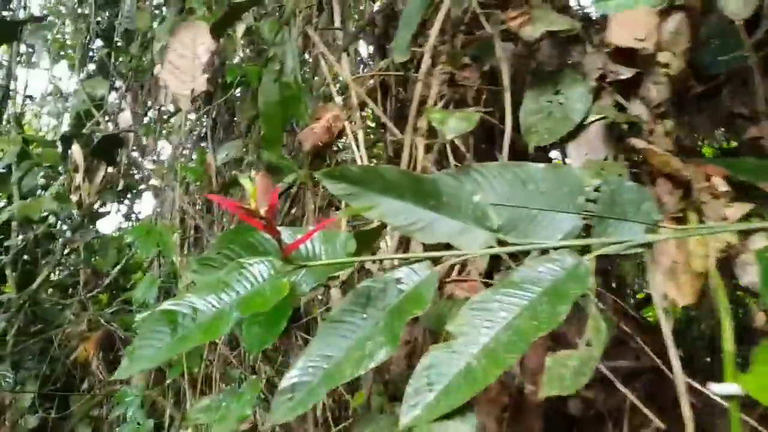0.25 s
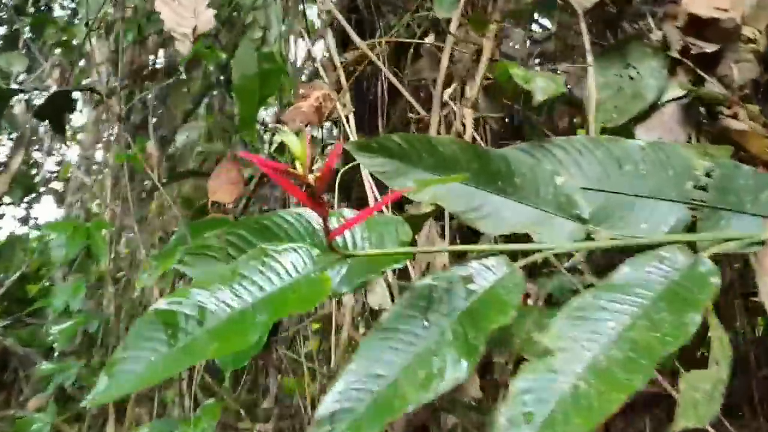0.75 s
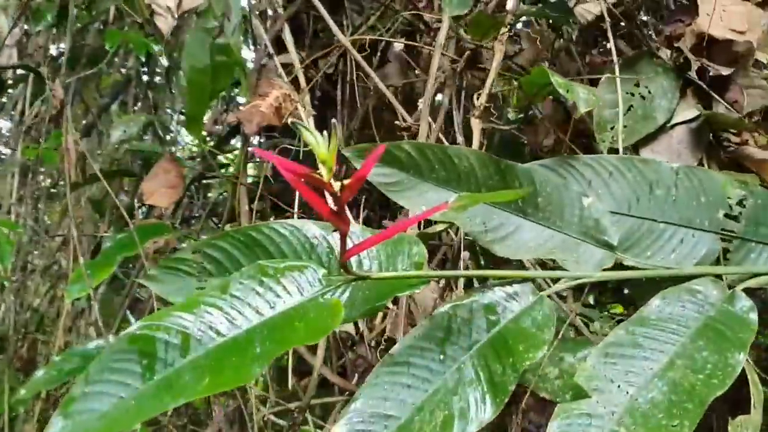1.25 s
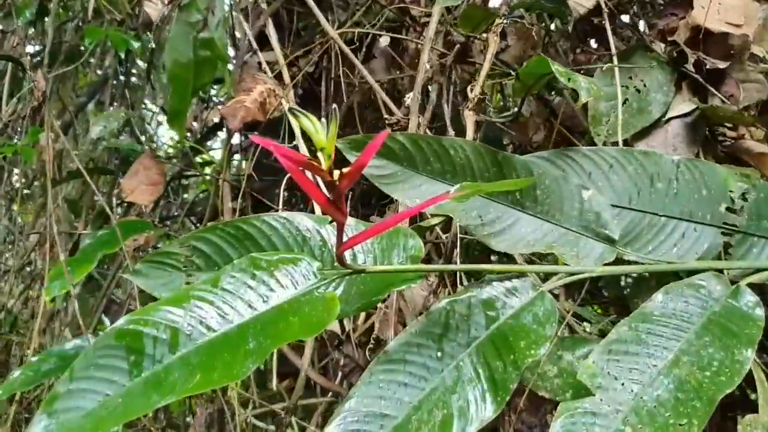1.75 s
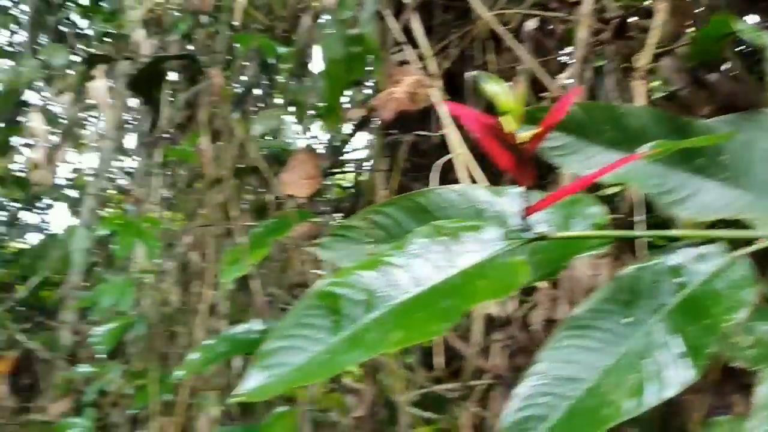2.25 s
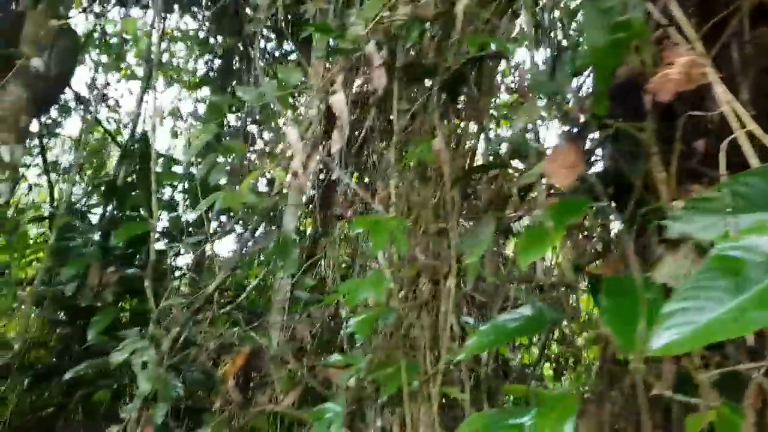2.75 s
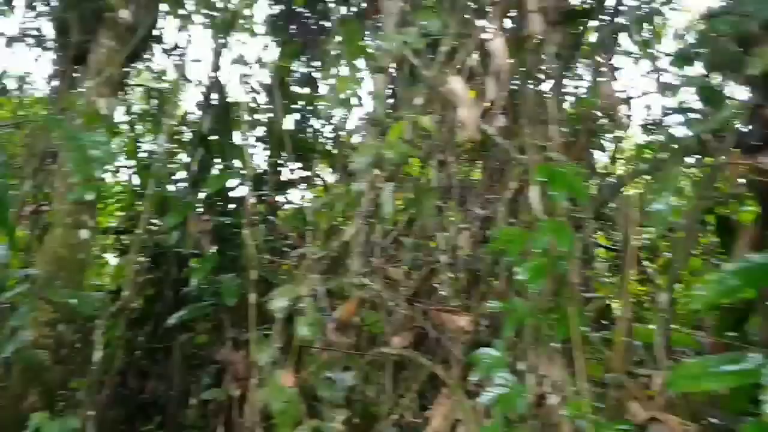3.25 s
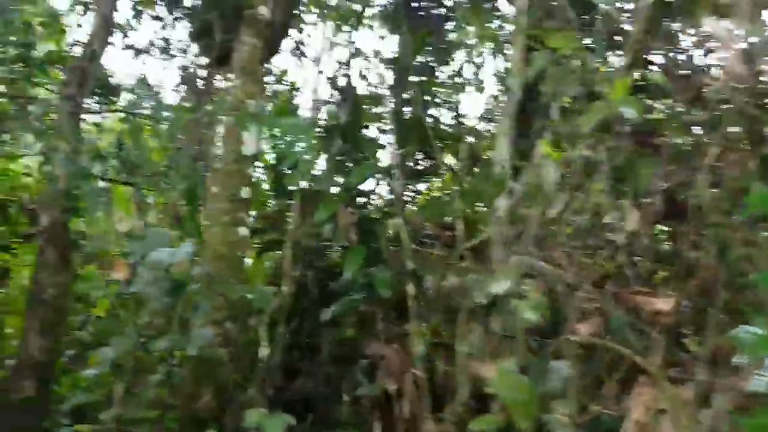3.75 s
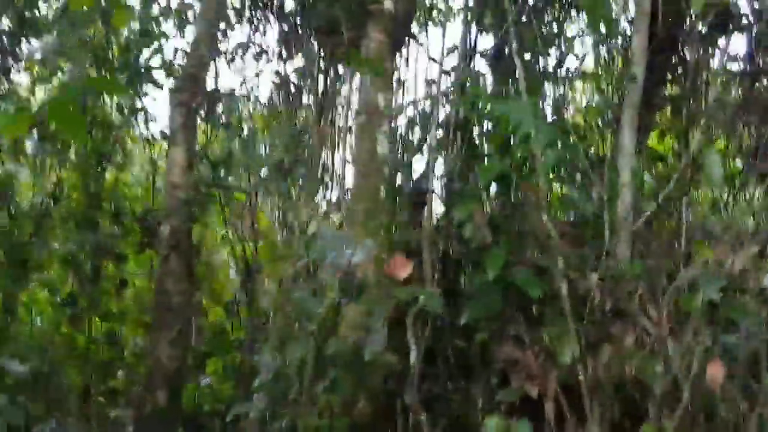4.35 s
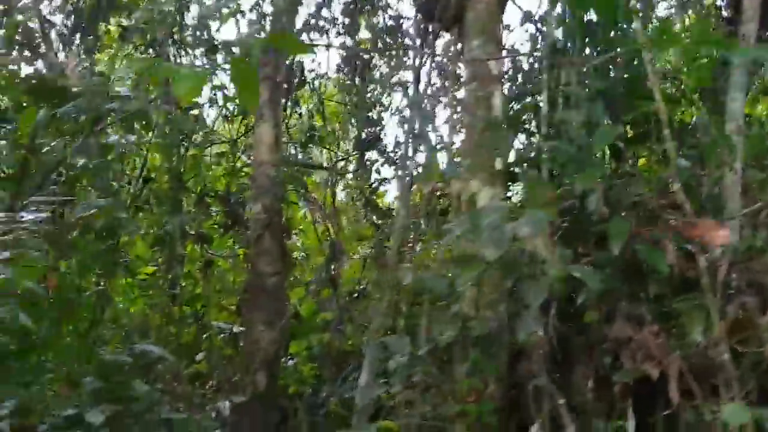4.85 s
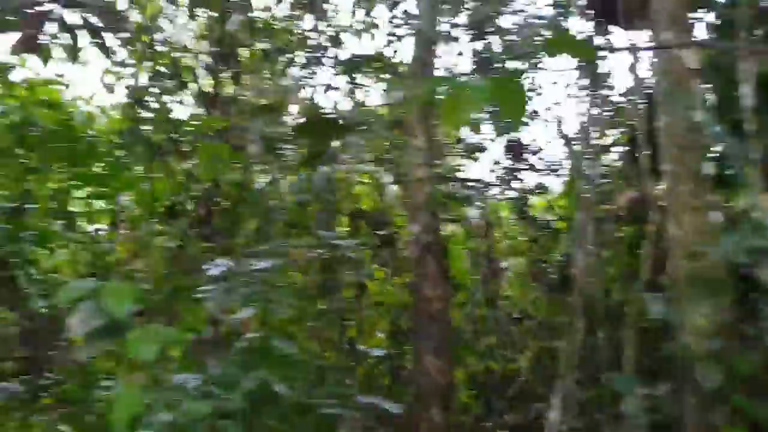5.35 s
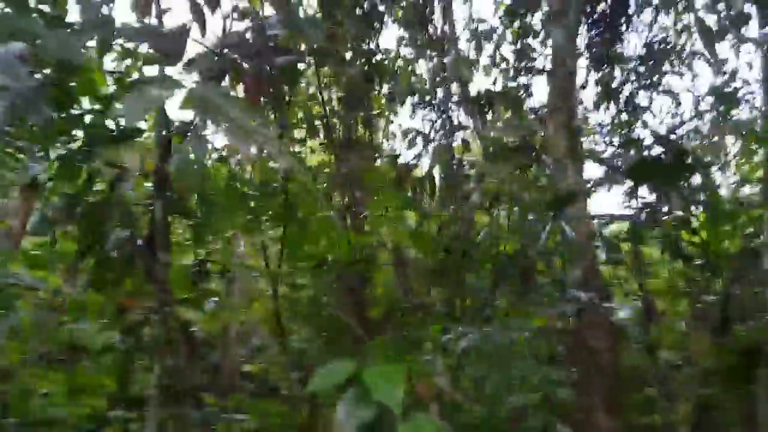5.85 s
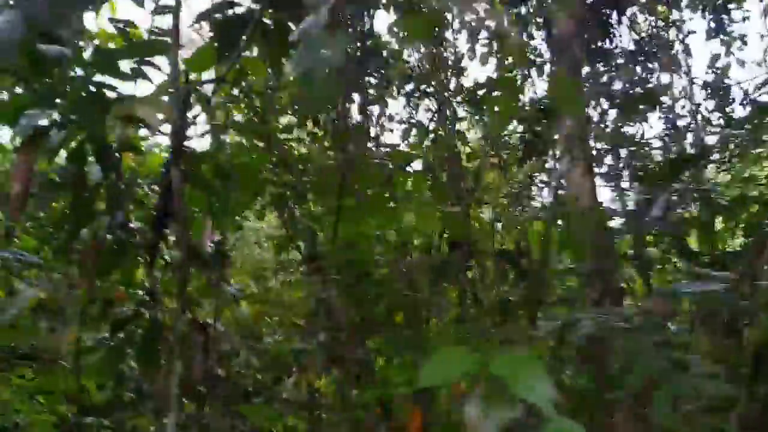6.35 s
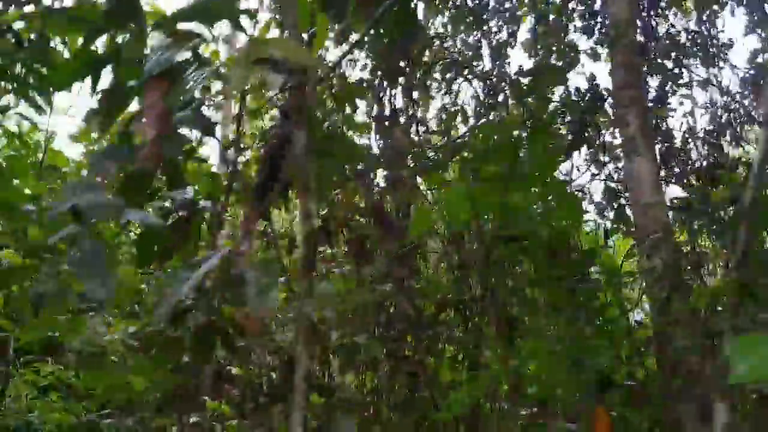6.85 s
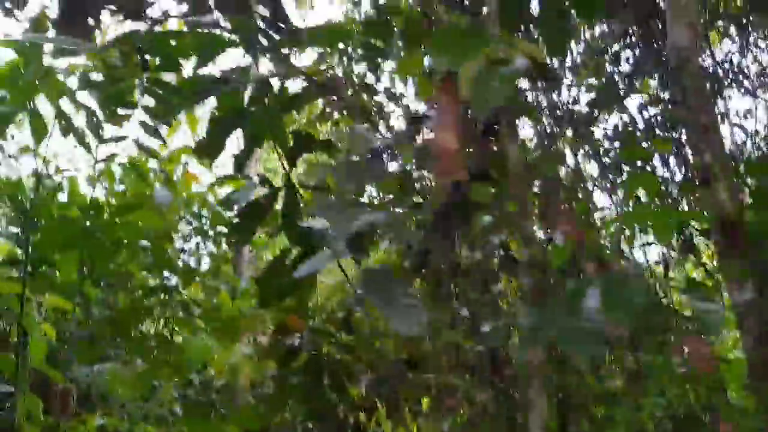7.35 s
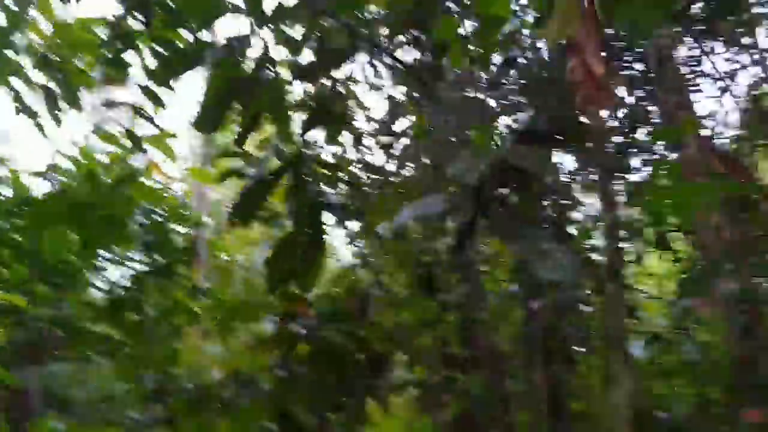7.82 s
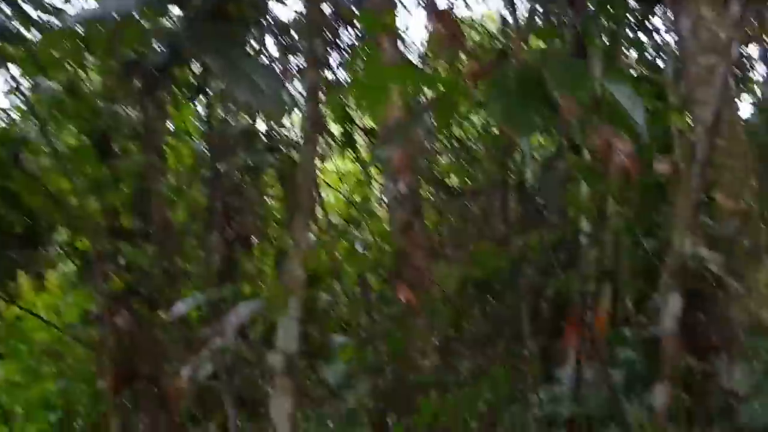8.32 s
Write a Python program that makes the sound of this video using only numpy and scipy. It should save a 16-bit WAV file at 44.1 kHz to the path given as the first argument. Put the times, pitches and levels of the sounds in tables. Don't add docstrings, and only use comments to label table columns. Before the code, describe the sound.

Close dry crackles, twig snaps and leaf scrapes of a walker in dense forest, building to a loud crunch, with far falling bird calls behind.

```python
import sys
import numpy as np
from scipy import signal
from scipy.fft import rfft, irfft, next_fast_len
from scipy.io import wavfile
from scipy.ndimage import uniform_filter1d

SR = 44100
rng = np.random.default_rng(int(sys.argv[2]) if len(sys.argv) > 2 else 0)


def boost(x):
    u = np.asarray(x, float) / 20
    return 10 ** u


def materialize(psi):
    bounded = np.clip(np.atleast_2d(psi).T, -1, 1)
    quanta = np.round(bounded * 32767).astype(np.int16)
    wavfile.write(sys.argv[1], SR, quanta)


N = 378378
TIME = np.arange(N) / SR


def along(table, hz):
    table_hz, value = np.transpose(table)
    return np.interp(np.log(hz + 1), np.log(table_hz), value)


def level(x, db):
    return x * boost(db) / np.sqrt(np.mean(x ** 2))


def band(x, lo_hz, hi_hz):
    sos = signal.butter(2, [lo_hz, min(hi_hz, .45 * SR)], "band", fs=SR, output="sos")
    return signal.sosfilt(sos, x)


def resonate(x, hz, width_hz):
    r = np.exp(-np.pi * width_hz / SR)
    return signal.lfilter([1, 0, -1], [1, -2 * r * np.cos(2 * np.pi * hz / SR), r * r], x)


def walk(rate_hz):
    hold = int(SR / rate_hz)
    steps = np.repeat(rng.standard_normal(N // hold + 1), hold)
    return 1.374 * uniform_filter1d(uniform_filter1d(steps, hold), hold)[:N]


def add(out, sound, start_s):
    i = int(start_s * SR)
    out[:, i:i + sound.shape[-1]] += sound[..., :N - i]


def ports(a, b, colour=None):
    # hz, likeness (0-1)
    likeness = [(60, 0.68), (130, 0.91), (290, 0.86), (640, 0.61), (1410, 0.05), (3100, 0.05), (6820, 0),
                (15000, 0)]
    # hz, left_minus_right_db
    tilt = [(60, -6), (110, 10.5), (200, 1.5), (380, 2), (700, 2.5), (1290, 2), (2380, -2), (4400, 0.5),
            (8120, -1.5), (15000, 1)]
    size = next_fast_len(N)
    hz = np.arange(size // 2 + 1) * SR / size
    like = np.clip(along(likeness, hz), 0, 1)
    left, right = rfft(a, size), rfft(b, size)
    right = like * left + np.sqrt(1 - like ** 2) * right
    db = np.outer([.5, -.5], along(tilt, hz))
    if colour:
        db = db + along(colour, hz)
    return irfft(boost(db) * [left, right], size)[:, :N]


def trees(x, t60_s, wet_db, build_s, lo_hz):
    t = np.arange(SR // 3) / SR
    noise = rng.standard_normal((2, len(t)))
    noise = band(noise[0] + band(noise - noise[0], 680, 20000), lo_hz, 19100)
    tail = noise * np.exp(-np.log(1000) * t / t60_s) * (1 - np.exp(-t / build_s))
    tail = tail / np.sqrt(np.sum(tail ** 2) / 2)
    return x + boost(wet_db) * signal.oaconvolve(x, tail, axes=1)[:, :N]


def forest():
    # hz, density_db (per Hz)
    air_colour = [(30, -9.5), (90, 3.5), (160, -24.5), (300, -7.5), (700, -2), (1400, -1.5), (2500, -4.5),
                  (5700, -8.5), (8700, -14.5), (12000, -12.5), (14800, -25)]
    # pitch_hz, width_hz, level_db
    insect_bands = [(7416, 220, -61.5), (7289, 1293, -55.5)]
    # multiple, level_db
    harmonics = [(1, -59), (2, -7), (3, 0.5), (4, 3), (5, 1), (6, -1.5), (7, -7), (8, -35)]
    engine_hz = 25.94
    air = level(ports(*rng.standard_normal((2, N)), air_colour), -53.5)
    chorus = rng.standard_normal((2, N)) * boost(.8 * walk(4.) + 1.2 * walk(40.))
    insects = sum(level(band(chorus, hz - width / 2, hz + width / 2), db)
                  for hz, width, db in insect_bands)
    turn = 2 * np.pi * np.cumsum(engine_hz * (1 + 0.00305 * walk(1.69))) / SR
    hum = sum(boost(db) * np.cos(k * turn) for k, db in harmonics)
    hum = hum * boost(0.5 * walk(0.91) + 1.91 * walk(21.0))
    return air + insects + level(hum, -63.5)


def tone(length_s, first_hz, last_hz, db, bend, fall, throb_hz=30., flick_hz=0, depth=0.75, swell=0.15):
    u = np.linspace(0, 1, int(length_s * SR))
    beat = u * length_s * throb_hz % 1
    hz = last_hz + (first_hz - last_hz) * (1 - u) ** bend + flick_hz * beat ** 2
    shape = u ** max(swell, .02) * (1 - u) ** fall * (1 - depth * beat)
    return boost(db + 6.5) * shape * np.sin(2 * np.pi * np.cumsum(hz) / SR)


def whistles():
    # start_s, length_s, first_hz, last_hz, level_db, swell (0-1)
    calls = [
        (3.628, 0.0525, 3373, 1837, -39, 0.23),
        (3.867, 0.0528, 3340, 1903, -40, 0.22),
        (4.008, 0.05, 3333, 1909, -38.5, 0.24),
        (6.004, 0.048, 4700, 1198, -41.5, 0.23),
        (6.141, 0.054, 4936, 1202, -43.5, 0.07),
        (8.341, 0.054, 3450, 1908, -43.5, 0.47),
    ]
    out = np.zeros((2, N))
    for start_s, length_s, first_hz, last_hz, db, swell in calls:
        octaves = np.log2(first_hz / last_hz)
        bend, fall = 1 + .3 * octaves, max(.65 - .28 * octaves, .08)
        call = tone(length_s, first_hz, last_hz, db, bend, fall, 190., 118.5, depth=0.522, swell=swell)
        add(out, call, start_s)
    out *= boost(3. * np.array([walk(240.), walk(240.)]))
    out = trees(out, .04, -4., .003, 900)
    return trees(out, .42, 5., .007, 2600)


def notes():
    # start_s, length_s, first_hz, last_hz, level_db
    chirps = [
        (7.281, 0.0163, 3825, 4450, -45.5),
        (7.31, 0.0145, 4162, 4490, -42),
        (7.345, 0.0108, 4204, 4095, -38.5),
        (8.116, 0.0135, 3606, 3270, -48.5),
        (8.138, 0.0215, 3060, 3306, -46),
    ]
    # start_s, length_s, pitch_hz, level_db, throb_hz
    trills = [
        (3.244, 0.061, 4750, -47, 85),
        (3.356, 0.048, 4820, -63.5, 60),
        (6.33, 0.113, 4540, -56, 72.4),
        (7.366, 0.022, 3899, -38, 95.8),
        (7.311, .012, 4810, -49.5, 60),
        (7.372, .015, 4680, -49, 60),
        (7.574, 0.0406, 2040, -43, 30),
        (7.982, 0.066, 4891, -51, 59.5),
        (8.176, 0.052, 3620, -52, 59.4),
        (8.357, 0.031, 4900, -56.5, 70),
    ]
    # start_s, length_s,
    # pitch_hz, level_db
    steady_notes = [
        (3.69, 0.0154, 1510, -51.5),
        (3.94, 0.0162, 1517, -54),
        (5.751, 0.0215, 461.5, -49),
        (5.867, 0.0186, 628, -46.5),
        (5.915, 0.0085, 1160, -52.5),
        (7.785, 0.0584, 846.5, -43.5),
        (8.4, 0.043, 1530, -64),
    ]
    rows = [(*chirp, 4.) for chirp in chirps]
    rows += [(s, length_s, hz, hz, db, throb_hz) for s, length_s, hz, db, throb_hz in trills]
    rows += [(s, length_s, hz, hz, db, 8.9) for s, length_s, hz, db in steady_notes]
    out = np.zeros((2, N))
    for start_s, length_s, first_hz, last_hz, db, throb_hz in rows:
        note = tone(length_s, first_hz, last_hz, db, 1, .25, throb_hz, 7.0 * throb_hz, depth=.55)
        add(out, note, start_s)
    return trees(out * boost(2.19 * walk(150.)), 0.56, -0.82, 0.0045, 1390)


def thuds():
    # start_s, peak_db, pitch_hz, length_s
    footfalls = [(3.026, -51.5, 35.0, 0.043), (3.531, -49.5, 53.5, 0.036), (3.642, -43.5, 88, 0.0377),
                 (3.733, -43, 61.9, 0.074), (3.878, -50.5, 45.8, 0.028), (4.236, -56.5, 120.5, 0.065),
                 (4.295, -58.5, 97.6, 0.051), (5.038, -56, 80.2, 0.055), (5.336, -53, 60, 0.072),
                 (4.54, -45, 95.2, 0.0515), (4.6, -45.5, 40.2, 0.079), (4.829, -41, 65.2, 0.043),
                 (5.457, -54, 91, 0.057), (7.076, -52.5, 61.9, 0.044), (7.159, -58, 99, 0.06),
                 (7.668, -41, 65, 0.044), (7.698, -43.5, 75.4, 0.042), (7.625, -41.5, 140, 0.0575),
                 (7.715, -44.5, 140.5, 0.057), (7.754, -47, 56.5, 0.034)]
    out = np.zeros((2, N))
    for start_s, peak_db, hz, length_s in footfalls:
        t = np.arange(int(max(length_s, .01) * SR)) / SR
        swing = np.sin(2 * np.pi * hz * t + np.array([[0], [1.3]])) * np.sin(np.pi * t / t[-1]) ** 2
        add(out, boost(peak_db + np.array([[-1.1], [2.2]])) * swing, start_s)
    return out


def crackle(rate, scatter_db, hiss, tail_s):
    sizes = boost(2 * scatter_db * rng.exponential(size=N).clip(0, 2.5))
    breaks = (rng.random(N) < rate / SR) * sizes
    power = signal.lfilter([1], [1, -np.exp(-1 / (tail_s * SR))], breaks)
    envelope = np.sqrt(hiss + power / power.mean())
    return ports(*(envelope * rng.standard_normal((2, N))))


def undergrowth():
    # start_s, effort_db, dryness_db (of what is touched)
    stir = [(0.0, -55.5, 4), (0.62, -53, 0), (1.17, -57.5, 1.5), (1.7, -54.5, -2), (1.98, -57.5, 5),
            (3.3, -53, -2.5), (3.61, -50.5, -1), (4.06, -56.5, -1.5), (4.18, -49.5, 2), (4.7, -51.5, -0.5),
            (4.95, -47.5, -3.5), (5.19, -53.5, -1.5), (6.3, -51.5, -1.5), (6.6, -55.5, 1),
            (7.15, -52.5, -2.5), (7.5, -44, 0), (7.89, -53, -1), (8.58, -61, -1.5)]
    usual_db = -52
    start_s, effort_db, dry_db = np.transpose(stir)
    effort_db = np.interp(TIME, start_s, effort_db) - usual_db
    dry_db = np.interp(TIME, start_s, dry_db)
    broad_db = usual_db + 1.19 * effort_db - 0.089 * dry_db + 0.097
    small_db = usual_db + 1.137 * effort_db + 0.39 * dry_db - 0.118
    hiss_db = usual_db + effort_db + 0.545 * dry_db - 6
    litter_db = usual_db + effort_db - 0.66 * dry_db - 3.5
    broad = crackle(rate=280.0, scatter_db=3.5, hiss=0.317, tail_s=0.00168)
    dry = crackle(rate=300.0, scatter_db=5.0, hiss=0.78, tail_s=0.0029)
    swish = walk(13.0)
    out = level(band(broad, 1667, 3420), 2.79) * boost(broad_db + 0.99 * swish)
    out += level(band(dry + 0.383 * broad, 2693, 6186), 2.9) * boost(small_db + 2.54 * swish)
    out += level(band(dry, 4490, 13580), 6.31) * boost(hiss_db + 2.5 * swish)
    return out + level(band(broad, 116.8, 1116), 1.215) * boost(litter_db + 1.03 * walk(12.))


def swishes():
    # start_s, length_s, lowest_hz, highest_hz, level_db
    leaves = [(0, 0.0485, 2010, 3290, -43), (0.03, 0.108, 2000, 3800, -48),
              (0.091, 0.125, 2893, 4314, -46.5), (4.864, 0.049, 3300, 4400, -43.5),
              (4.99, .045, 2000, 5000, -48.5), (7.082, 0.0466, 2640, 4200, -44),
              (7.639, 0.127, 602, 950, -46.5), (0.411, 0.122, 1400, 3300, -49.5),
              (3.663, 0.123, 2000, 12000, -50), (4.473, 0.11, 2000, 6000, -52.5),
              (4.849, 0.133, 3000, 13000, -45), (5.609, 0.0913, 2120, 5770, -42.5),
              (6.274, 0.141, 2000, 12900, -48), (7.075, 0.0674, 2500, 9000, -45.5),
              (7.309, 0.142, 4500, 13800, -43.5), (7.615, 0.179, 139, 1270, -43),
              (7.617, 0.211, 2490, 7000, -35), (7.595, .27, 1972, 2403, -39), (8.1, 0.236, 1680, 4750, -49),
              (8.151, 0.0536, 500, 1100, -50.5), (4.214, .045, 1920, 9000, -46),
              (7.668, 0.069, 3000, 10000, -48.5), (7.485, .07, 3300, 4300, -45),
              (7.541, 0.086, 3000, 12000, -42.5), (5.861, 0.073, 2000, 5000, -60),
              (5.999, .08, 5000, 13000, -54)]
    out = np.zeros((2, N))
    for start_s, length_s, lo_hz, hi_hz, db in leaves:
        u = np.linspace(0, 1, int(length_s * SR))
        grain = boost(0.9 * walk(160.2)[:len(u)]) * rng.standard_normal((2, len(u)))
        add(out, level(band(grain, lo_hz, hi_hz), db + 5) * u ** 0.272 * (1 - u) ** 0.528, start_s)
    return out


def hollows():
    # start_s, peak_db, pitch_hz, length_s, sag (of pitch, 0-1)
    stems = [
        (3.4022, -36.5, 760, 0.00545, 0.27),
        (3.4718, -19.5, 637, 0.0041, 0.42),
        (3.486, -33.5, 473, 0.0091, 0.42),
        (4.008, -42, 560, 0.007, 0.36),
        (4.118, -43, 950, 0.0064, 0),
        (4.2356, -28, 420, 0.00437, 0.3),
        (4.262, -35, 520, 0.006, 0.74),
        (4.2813, -28, 792, 0.0064, 0.16),
        (7.447, -32, 676, 0.0195, 0.06),
    ]
    out = np.zeros((2, N))
    for start_s, peak_db, hz, length_s, sag in stems:
        u = np.linspace(0, 1, int(max(length_s, .002) * SR))
        cycles = -np.sin(2 * np.pi * np.cumsum(hz * (1 - sag * u)) / SR)
        ring = cycles * np.sin(np.pi * u ** 0.64) ** 1.8
        add(out, boost(peak_db + np.array([[1.1], [-1.1]])) * ring, start_s)
    return out


def knocks():
    # start_s, peak_db, ring_hz, t60_s
    pushes = [(0.606, -46.5, 340, 0.053), (2.578, -41, 1076, 0.031), (2.608, -30, 881, 0.0175),
              (3.471, -30, 329, 0.035), (3.487, -36, 332, 0.026), (3.571, -37.5, 824, 0.025),
              (4.095, -37.5, 900, 0.015), (4.102, -42, 700, .015), (4.236, -42, 352, 0.028),
              (4.745, -40.5, 363, 0.063), (5.651, -42.5, 148, 0.074), (6.206, -41.5, 1190, 0.019),
              (7.439, -34.5, 330, 0.0156), (7.52, -38.5, 152, 0.055), (7.615, -34.5, 166, 0.049),
              (7.643, -31.5, 190, 0.03), (7.672, -27, 424, 0.025), (7.698, -29.5, 395, 0.026),
              (7.748, -30, 575, 0.029), (8.155, -45, 815, 0.092)]
    out, t = np.zeros((2, N)), np.arange(4000) / SR
    crunches = band(rng.standard_normal((len(pushes), len(t))), 233, 960)
    for (start_s, peak_db, hz, t60_s), crunch in zip(pushes, crunches):
        fade = np.exp(-np.log(1000) * t / max(t60_s, .01))
        main = np.sin(2 * np.pi * hz * t)
        high = 1.37 * fade ** 4 * np.sin(2 * np.pi * 1.65 * hz * t)
        ring = resonate(fade * (main + high + 2.2 * crunch), 0.93 * hz, 1.6 * hz)
        gain = boost(peak_db + np.array([[3.1], [.9]]))
        add(out, gain * ring / np.abs(ring).max(), start_s + 0.004204)
    return out


def snaps():
    # start_s, peak_db, ring_hz, left_minus_right_db
    thick_twigs = [(0.382, -23.5, 1490, -0.5), (0.454, -37.5, 1010, 3), (0.6127, -33.5, 3500, 3.5),
                   (1.2513, -31, 1630, -2), (1.6715, -28, 6120, 0), (2.168, -23.5, 4300, 1),
                   (2.4962, -38, 2400, 3), (2.583, -24, 3120, -1.5), (3.1418, -30, 3300, 2.5),
                   (3.6036, -35, 3210, 3), (3.609, -36, 4000, 0.5), (3.598, -41, 1200, 0.5),
                   (4.7658, -30.5, 3240, 3), (4.807, -29, 1720, 1.5), (5.1757, -32, 2520, 2.5),
                   (5.3345, -33, 3900, 2), (5.47, -31, 4440, 1.5), (6.8698, -32.5, 2750, 0),
                   (7.1826, -32.5, 2020, -0.5), (7.4425, -28, 3200, -4.5), (7.4445, -24, 3380, -5),
                   (7.4465, -26, 2000, -3.5), (7.5288, -22.5, 3400, -5.5), (7.7065, -19, 3500, -0.5),
                   (7.629, -25.5, 2200, 1), (7.7484, -21, 4800, 1), (7.6248, -22, 2050, 0),
                   (7.6516, -24.5, 2180, 1.5), (7.6532, -19, 3000, 0.5), (8.1749, -33.5, 1490, -0.5),
                   (8.1936, -38.5, 3560, -2), (8.3065, -36.5, 6050, 7.5)]
    thin_twigs = [ (0.9717, -33.5, 2800, 3), (1.7927, -29.5, 2980, 3), (2.612, -22.5, 4340, 2.5),
                  (2.7758, -33, 2940, -3), (3.0664, -37, 2960, 3), (3.0899, -36, 2000, 4),
                  (3.484, -27, 4960, -2.5), (4.4214, -22.5, 7670, -6.5), (4.5114, -28.5, 1360, 0),
                  (4.8913, -27, 3740, -1.5), (5.2874, -30, 3100, 2), (5.441, -27.5, 2880, -4),
                  (5.491, -28.5, 3690, -1), (5.8107, -41, 4270, 0), (5.86, -53.5, 2400, -0.5),
                  (5.8985, -38, 2410, 1), (5.914, -40.5, 4000, -1), (5.996, -38, 5500, 0),
                  (6.4752, -35, 4580, 0.5), (6.8533, -34.5, 2840, -1), (6.832, -31.5, 2260, -2.5),
                  (7.0327, -34, 1980, 2.5), (7.087, -31.5, 3310, 2), (7.1084, -29, 3300, 2.5),
                  (7.6184, -10.5, 3780, -3.5), (7.676, -7.5, 5230, -2.5), (7.6884, -8, 6360, -1),
                  (7.7015, -15, 5260, -0.5), (7.7262, -14.5, 5800, -1.5), (8.11, -35, 3400, 0.5),
                  (8.365, -37, 2780, 0.5)]
    dry_leaves = [(0.1717, -29.5, 2270, -3.5), (0.724, -35.5, 2000, 3.5), (0.7736, -29, 6600, 3.5),
                  (1.6297, -30, 7400, 1), (2.2134, -33.5, 2550, 2.5), (2.3374, -25, 2740, -1.5),
                  (3.4163, -26, 9150, 0), (3.3623, -41.5, 4000, -2), (3.77, -31.5, 4500, 0),
                  (3.7757, -28, 2600, 2.5), (3.852, -35, 5000, 1), (4.4125, -28.5, 3590, -5),
                  (5.1003, -30.5, 3460, -2), (5.6116, -36.5, 2380, -8.5), (5.628, -27.5, 3800, 2.5),
                  (5.7074, -39, 4470, 3.5), (7.5225, -14, 7550, -6), (7.647, -10.5, 3940, -4),
                  (7.7605, -15, 3160, 0.5)]
    split_stems = [
        (3.2994, -30, 4770, 2.3),
        (4.2497, -26.5, 1110, 0.5),
    ]
    green_leaves = [
        (0.186, -31.5, 3000, 3.5),
        (0.4195, -35.5, 1980, -5.5),
        (0.4225, -26.5, 2420, -2),
        (0.4535, -42.5, 3200, 3),
        (0.4705, -32.5, 2150, -4),
        (0.4745, -43, 2500, -7),
        (0.5, -31, 2700, 3),
        (0.5035, -44, 3200, -7),
        (7.5227, -20, 3860, -4.5),
    ]
    small_ticks = [(0.2434, -41, 3463, 0.5), (0.3927, -35.5, 2430, 0.0), (0.7029, -31, 3090, 1.0),
                   (0.8584, -39.5, 3180, -1.5), (1.1505, -36, 3690, 2.0), (1.2112, -37.5, 3360, -2.0),
                   (1.4266, -35, 1740, 0.5), (1.6033, -36.5, 4390, 2.0), (1.6487, -28, 4530, 1),
                   (1.7699, -29.5, 2820, 1.5), (1.8511, -38.5, 2780, 0.0), (2.1321, -32.5, 3170, 0.5),
                   (2.2419, -34, 1820, 1.5), (2.2535, -34.5, 2200, -0.5), (2.4542, -36.5, 2080, 1.5),
                   (2.5647, -27, 2620, -2.0), (2.9305, -34, 3580, 0.0), (3.0121, -34.5, 4170, -0.5),
                   (3.0398, -34.5, 3470, -2), (4.5382, -29, 3360, -0.5), (4.5681, -41.5, 2650, -0.5),
                   (4.6679, -37.5, 2780, -1), (4.6918, -31.5, 2870, -1.0), (4.7315, -34.5, 2260, 0.0),
                   (4.9535, -32, 4090, -2.5), (4.9812, -32.5, 3780, -4), (5.0162, -31, 2800, -2.5),
                   (5.1326, -36, 3500, -0.5), (5.327, -30, 3120, -1.0), (5.3824, -36, 3720, 0.0),
                   (5.4975, -28.5, 4420, -0.5), (5.529, -34, 2450, -0.5), (6.8339, -33, 2260, -1.5),
                   (6.9033, -39.5, 4020, -1), (7.1765, -31.5, 3500, -2.0)]
    # snaps, crack_db, treble_db, body_db
    kinds = [(thick_twigs, -4.5, -13, -1.6), (thin_twigs, -5, -9.5, -16.5),
             (dry_leaves, -14, -0.26, -14), (split_stems, -1.95, 8.4, 3.45),
             (green_leaves, -20.5, -35, -15.5), (small_ticks, -6.5, -7, -11)]
    rows = [(*snap, *colour) for kind, *colour in kinds for snap in kind]
    out, t = np.zeros((2, N)), np.arange(1500) / SR
    noise = rng.standard_normal((len(rows), 2, len(t)))
    noise[..., 8] = 2.627
    shape = (np.exp(-t / .00055) + .09 * np.exp(-t / .004)) * (1 - np.exp(-t / .00013))
    bursts = shape * (noise[:, :1] + 0.73 * noise)
    middles, trebles = band(bursts, 1170, 6530), band(bursts, 2570, 13700)
    bodies = band(bursts, 547, 2213)
    for row, burst, middle, treble, body in zip(rows, bursts, middles, trebles, bodies):
        start_s, peak_db, hz, pan_db, crack_db, treble_db, body_db = row
        crack = level(resonate(burst, hz, .35 * hz), 0) + level(middle, crack_db)
        crack += level(treble, treble_db) + level(body, body_db)
        crack *= boost(peak_db + 6.5) / np.abs(crack).max(axis=1, keepdims=True)
        lag = int(np.clip(12 - 3 * pan_db, 0, 30))
        crack[0] = np.pad(crack[0], (lag, 0))[:len(t)]
        add(out, crack * boost(np.array([[.5], [-.5]]) * pan_db), start_s)
    return out


def scene():
    hollow = hollows()
    walker = undergrowth() + swishes() + thuds() + 0.764 * hollow
    walker += trees(snaps() + knocks() + 0.388 * hollow, 0.0953, -7.0, 0.00157, 168)
    return forest() + walker + whistles() + notes()


def roll_off(x):
    return signal.sosfilt(signal.butter(12, 16500, fs=SR, output="sos"), x)


def record(dry):
    fade = signal.butter(4, 15400, fs=SR, output="sos")
    edge = signal.ellip(8, .3, 60, 16400, fs=SR, output="sos")
    mix = signal.sosfilt(np.vstack([fade, edge]), dry)
    return roll_off(mix)


dry = scene()
out = record(dry)
materialize(out)
```